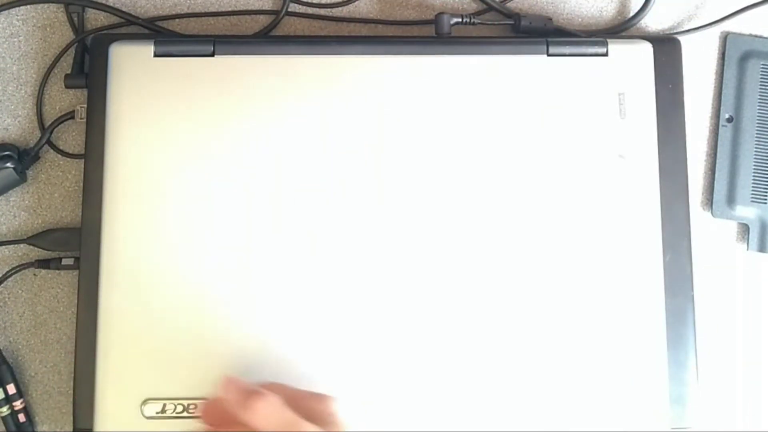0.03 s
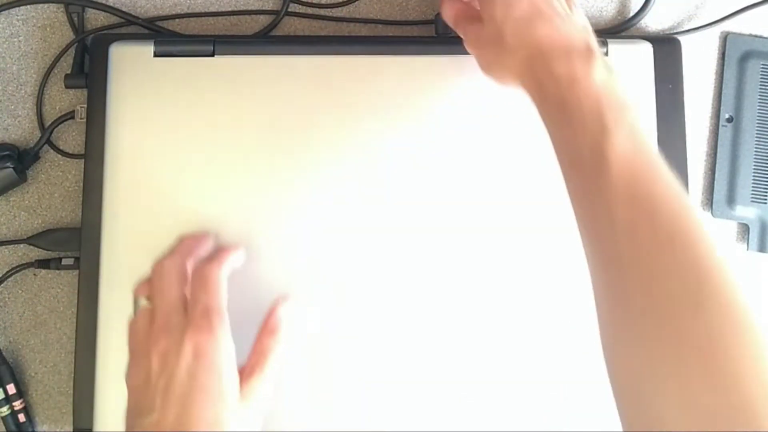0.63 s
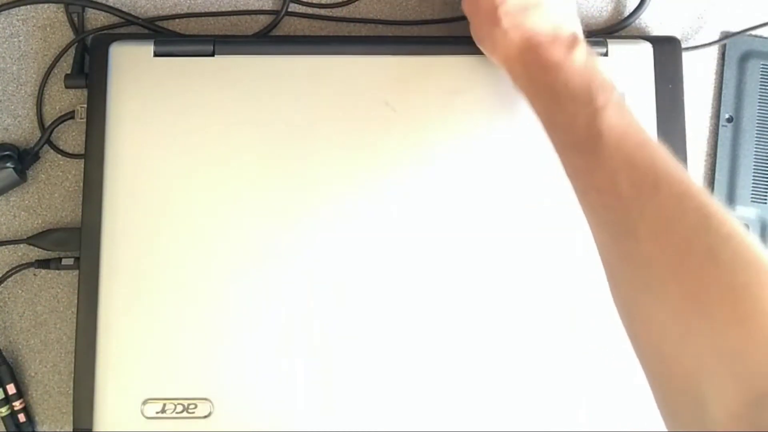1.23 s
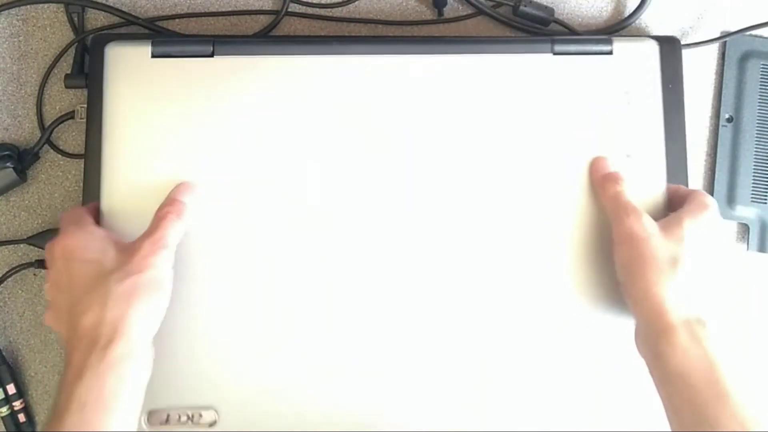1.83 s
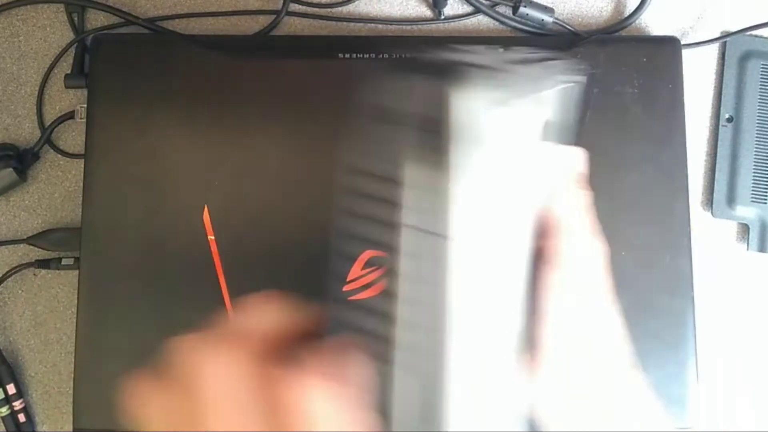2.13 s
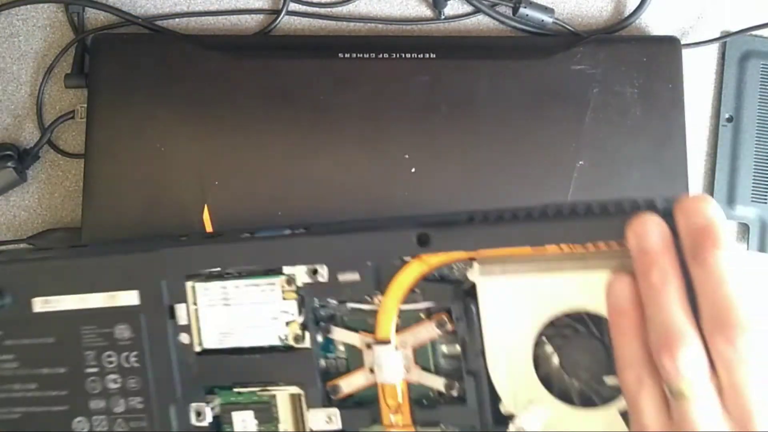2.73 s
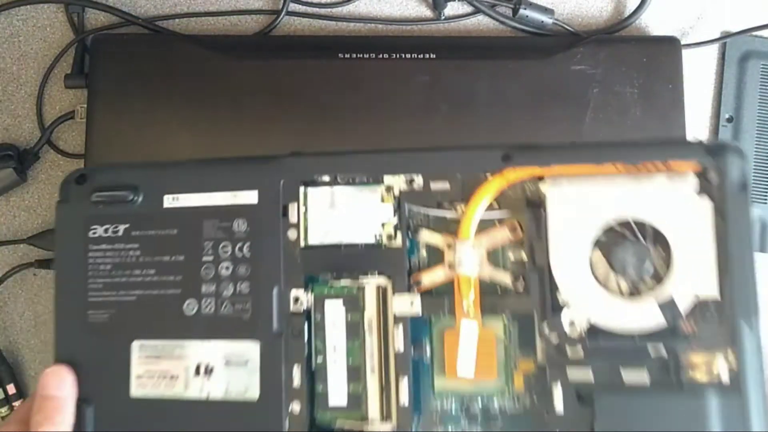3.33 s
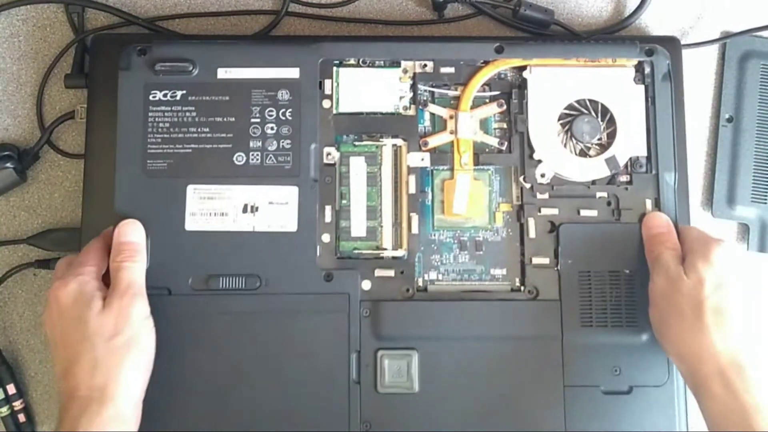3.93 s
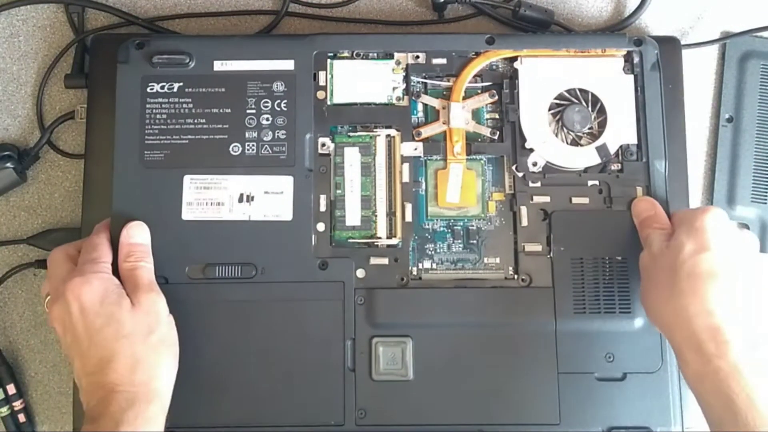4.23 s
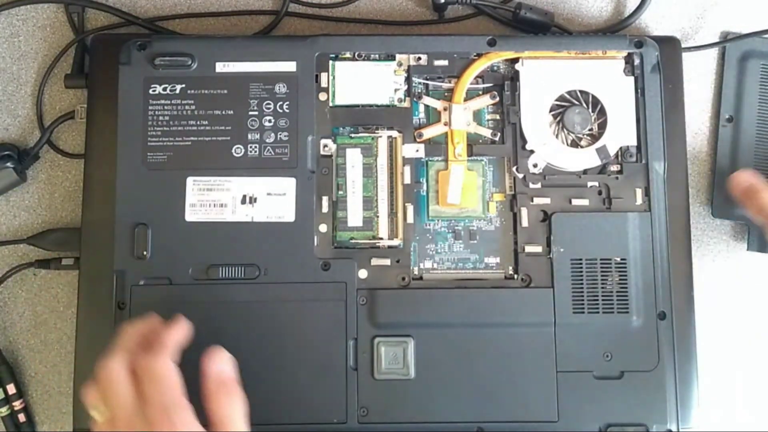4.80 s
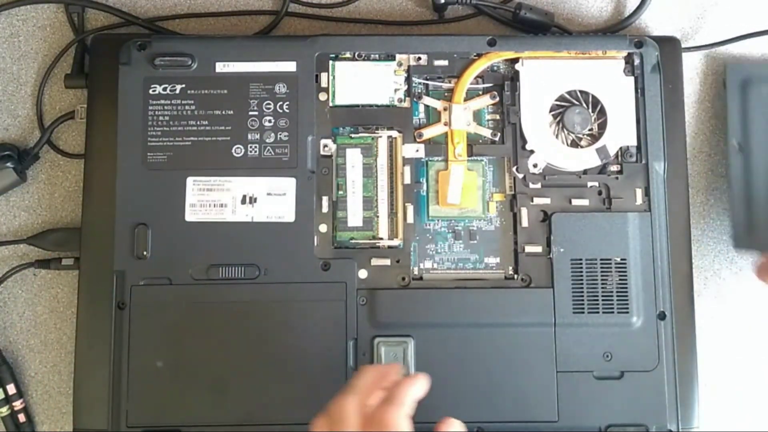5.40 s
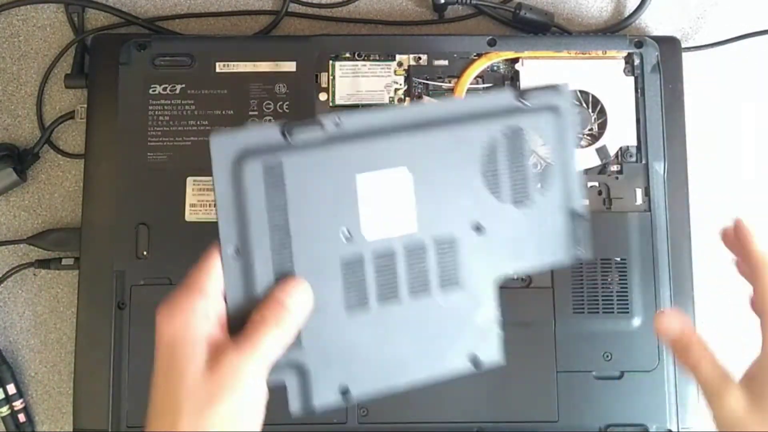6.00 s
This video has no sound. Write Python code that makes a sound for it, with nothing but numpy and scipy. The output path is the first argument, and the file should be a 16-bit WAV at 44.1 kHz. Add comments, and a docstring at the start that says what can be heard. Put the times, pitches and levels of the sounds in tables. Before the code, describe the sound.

A sharp latch snap, scattered plastic clicks and hand rustles, then a hollow thump as a laptop is set down, close up.

```python
"""Laptop shut and turned over

Close up, a closed laptop on a table clicks at its latch, is gripped, lifted, turned over and set down again.
Each plastic edge clicks twice, touching and then seating, and the sprung latch snaps in and bounces. Blunt
blows knock on the case and make the table boom; sliding hands swish. A low rumble and a soft hiss fill the
small room; a few faint, high chirps waver in the background."""
import sys
import numpy as np
from scipy import signal
from scipy.fft import rfft, irfft, next_fast_len
from scipy.io import wavfile

SR = 44100
rng = np.random.default_rng(int(sys.argv[2]) if len(sys.argv) > 2 else 0)


def file_out(sig):
    """Save sig as 16-bit WAV at sys.argv[1]."""
    # one column per channel
    cols = np.atleast_2d(sig).T
    # limit, then scale
    lim = np.clip(cols, -1, 1)
    pcm = np.round(lim * 32767).astype(np.int16)
    wavfile.write(sys.argv[1], SR, pcm)


N = 267113
TIME = np.arange(N) / SR
AGE = np.arange(SR // 2) / SR   # seconds since a hit

# colour of the low rumble: freq_hz, level_db
RUMBLE_COLOUR = [(20, -45), (40, -13), (58, -7), (72, 8.5), (86, 0.5), (115, -5), (160, -24.5), (240, -52)]
# the rumble's slow rise and fall: time_s, level_db
RUMBLE_RIDE = [(0, -49), (1.1, -48.5), (1.5, -54.5), (2.6, -49), (3.1, -52), (3.85, -55), (4.13, -46),
               (4.45, -53), (5.3, -48), (5.6, -58), (5.8, -52)]
# the opening drone sinking into the bed: time_s, level_db
DRONE_FADE = [(0, -52), (1.0, -55), (1.4, -67.5)]
# colour of the hollow murk behind the handling: freq_hz, level_db
MURK_COLOUR = [(120, -3.5), (200, -4.5), (270, 4), (320, -3.5), (400, 2.5), (480, 1), (570, -7.5),
               (700, -6), (900, -20.5), (2000, -23.5)]
# plastic contacts, with their top, mid and low levels: start_s, edge_db, clack_db, hollow_db, seat_s
CONTACTS = [(0.2143, -20, -28, -25.5, 0.00047), (0.2243, -9, -22.5, -17, 0.0035),
            (0.237, -37, -26, -24.5, 0.017), (0.896, -41, -46.5, -36, 0.015),
            (1.1183, -25.5, -22.5, -38, 0.0053), (1.47, -49.5, -32.5, -30.5, 0.016),
            (1.575, -24, -38, -31, 0.0041), (1.808, -35.5, -49, -35.5, .03), (2.189, -34, -42, -38.5, .003),
            (2.249, -36.5, -44.5, -56, 0.0011), (2.35, -44, -41, -45, .002),
            (2.625, -55, -41.5, -50, 0.0075), (2.696, -34, -38.5, -56, .007),
            (3.202, -47, -39, -33, 0.00201), (3.701, -33, -34.5, -38, .002), (3.907, -52.5, -55, -37, .018),
            (4.103, -39, -39, -29.5, .003), (4.137, -39, -42.5, -52, .014),
            (4.541, -30, -37.5, -25.5, 0.014), (4.565, -17, -24.5, -18, 0.0097),
            (4.586, -24.5, -26, -53, .013), (4.612, -36.5, -36.5, -29.5, .034),
            (4.931, -43, -38, -39, .002), (5.019, -53, -49, -44.5, 0.017),
            (5.405, -43.5, -43.5, -40.5, .018), (5.782, -38.5, -41.5, -33, .003)]
# colour shared by all plastic clicks: freq_hz, level_db
PLASTIC_COLOUR = [(120, -9), (300, -2), (700, -1), (1000, -6), (1400, -2.5), (2200, 0), (3100, -3),
                  (3900, -8), (5000, -6), (6800, -8), (8300, -4.5), (9800, 0), (11200, -7), (15500, -13)]
# modes of the thin plastic shell: pitch_hz, level_db, t60_s
SHELL_MODES = [(1386, -10, 0.12), (1710, -0.5, 0.12), (2090, 0.5, 0.065), (2300, -13, 0.04),
               (2920, -8, 0.11), (3440, 6, 0.047), (3690, -3, 0.1), (4387, 2, .08), (5130, -9, .08)]
# the small room's decay: freq_hz, t60_s
ROOM_DECAY = [(300, .26), (1500, .23), (5000, .18), (12000, .16)]
# the lid latch snapping in and bouncing: start_s, level_db
LATCH_HITS = [(0.2275, -6.5), (0.2634, -16), (0.3, -31)]
# modes of the latch spring: pitch_hz, level_db, t60_s
SPRING_MODES = [(4590, -9, .13), (4856, -9, .14), (5792, -10, .22), (7698, -10, .2), (9362, -3, .15),
                (9560, -2, .17), (9698, -1, .17), (9960, -4, .15), (10105, -3, .15), (10363, -2, .16),
                (10423, -1, .16), (10503, -3, .15), (11690, -4, .13), (11830, -3, .13), (12220, -7, .13)]
# blunt blows of fingers, palms and the laptop's feet: start_s, case_db, spot_hz, table_db
BLOWS = [(0.229, -34, 258.5, -44), (0.497, -39.5, 320, -53), (1.122, -35, 522, -35), (1.323, -41, 340, -63),
         (1.5735, -21, 438, -27.5), (1.8092, -27.5, 477, -63), (2.376, -37.5, 314, -73),
         (2.908, -40, 362, -82), (3.0155, -36.5, 337, -58), (3.428, -33, 884, -52),
         (3.771, -41.5, 342, -71), (4.137, -35, 334, -36), (4.566, -11.5, 660, -15),
         (4.574, -22, 246, -18.5), (4.5757, -18, 723, -46), (4.647, -32, 416, -26)]
# modes of the laptop case: pitch_hz, level_db, t60_s
CASE_MODES = [(178, -11, 0.65), (246, 7, 0.13), (290.7, -4.5, 0.74), (343.7, 4, 0.21), (442, -1, 0.34),
              (473, -2.5, 0.19), (588, -16, 0.36), (670, -8, 0.0646), (730, 2, 0.16), (787, -17, 0.6),
              (1125, -3, 0.054), (1400, 2, 0.098)]
# modes of the loaded table top: pitch_hz, level_db, t60_s
TABLE_MODES = [(55, -17, 0.29), (73.2, 2, 0.5), (99.4, -8.5, 0.31), (124.4, -17, 0.36)]
# hands sliding over the case: peak_s, speed_up_s, slow_down_s, level_db
HAND_STROKES = [(0.682, 0.32, 0.18, -65.5), (1.12, 0.28, 0.29, -63.5), (1.78, 0.13, 0.05, -49),
                (2.08, 0.14, .15, -55.5), (2.22, 0.1, 0.087, -49.5), (2.67, 0.33, .19, -38),
                (2.9, 0.3, 0.24, -57), (3.334, 0.18, 0.31, -39), (3.7, 0.29, 0.24, -60),
                (4.06, 0.21, 0.57, -60), (4.8, 0.36, 0.14, -61.5), (5.28, 0.15, 0.33, -64),
                (5.75, 0.08, 0.26, -68)]
# airy top of sliding skin: freq_hz, level_db
SWISH_COLOUR = [(2000, -28.5), (4500, -16.5), (6500, -11.5), (8300, -3), (9800, 2), (11000, -2),
                (12400, -8), (14000, -4.5)]
# lower body of the rub: freq_hz, level_db
DRAG_COLOUR = [(300, -2), (700, 6.5), (1100, 1.5), (1700, 1.5), (3000, -2.5), (5000, -5.5), (9000, -10),
               (15000, -29.5)]
# faint high chirps in the background: start_s, length_s, pitch_hz, level_db
CHIRP_CUES = [(1.016, 0.15, 2680, -56.5), (3.545, 0.19, 2900, -60), (4.213, 0.29, 2450, -60.5)]


def from_db(db):
    """Decibels to gain."""
    return 10 ** (np.asarray(db) / 20)


def unit_rms(x):
    """Scale to an rms of 1."""
    return x / np.sqrt(np.mean(x ** 2) + 1e-20)


def in_time(curve):
    """Read a level curve at every sample."""
    return np.interp(TIME, *np.transpose(curve))


def at_hz(points, hz):
    """Read a curve on a log-frequency axis."""
    known_hz, values = np.transpose(points)
    return np.interp(np.log(hz + 1e-9), np.log(known_hz), values)


def add(track, start_s, sound):
    """Drop a sound into the track."""
    start = int(start_s * SR)
    track[start:start + len(sound)] += sound[:N - start]


def eq(x, colour):
    """Shape a sound with a curve of freq_hz, level_db points."""
    size = next_fast_len(len(x))
    gain = from_db(at_hz(colour, np.fft.rfftfreq(size, 1 / SR)))
    return irfft(rfft(x, size) * gain, size)[:len(x)]


def noise(colour, size=N):
    """Coloured noise, rms 1."""
    return unit_rms(eq(rng.standard_normal(size), colour))


def drift(per_s):
    """A wobble that glides between random values of spread 1."""
    knots = rng.standard_normal(4000)
    return np.interp(TIME * per_s, np.arange(len(knots)), knots)


def attack(rise_s):
    """A soft onset from 0 towards 1."""
    return 1 - np.exp(-AGE / rise_s)


def ring(hz, t60):
    """A struck mode of height 1."""
    return np.sin(2 * np.pi * hz * AGE) * from_db(-60 * AGE / t60)


def room_tail(x):
    """Let a noise die away as the room does, treble first."""
    edges_hz = [0, 700, 2000, 5000, 10000, SR / 2]
    hz, spectrum = np.fft.rfftfreq(len(x), 1 / SR), rfft(x)
    tail = np.zeros(len(x))
    for low, high in zip(edges_hz, edges_hz[1:]):
        band = irfft(spectrum * ((hz >= low) & (hz < high)), len(x))
        tail += band * from_db(-60 * AGE / at_hz(ROOM_DECAY, (low + high) / 2))
    return tail


def room_bed(effort_db, hiss_db=-73, murk_db=-53.5, murk_follow=0.15, throb_db=2.4):
    """Even hiss, a hollow murk that rises with the handling, a fading drone and a throbbing rumble."""
    hiss = noise([(500, 7.5), (2000, 6.5), (6000, -14), (10000, 10), (12000, -18), (15000, -10.5)])
    murk = noise(MURK_COLOUR) * from_db(murk_db + murk_follow * effort_db + 2 * drift(per_s=16))
    drone = noise([(90, -53), (130, -4.5), (185, -31), (600, -66)]) * from_db(in_time(DRONE_FADE))
    rumble = noise(RUMBLE_COLOUR) * from_db(in_time(RUMBLE_RIDE) + throb_db * drift(per_s=17))
    return from_db(hiss_db) * hiss + murk + drone + rumble


def touches(seat_db=-2, quick_decay_s=0.0025, stretch=0.68):
    """An edge touches, then seats a little softer; the slower it seats, the longer both touches scuff."""
    for start_s, edge_db, clack_db, hollow_db, seat_s in CONTACTS:
        decay_s = quick_decay_s + stretch * seat_s
        for delay_s, db in ((0, 0), (seat_s, seat_db)):
            yield start_s + delay_s, edge_db + db, clack_db + db, hollow_db + db, decay_s


def plastic_clicks(crack_db=-0.5, wash_db=-10.5, shell_db=-21, ripple_db=3):
    """Each touch is a short crack, a ring of the shell and a wash of dense modes and room reflections."""
    out = np.zeros(N)
    ripple_hz, fine_hz = np.linspace(100, 16000, 90), np.linspace(100, 16000, 400)
    # the shell's countless small modes and the room are the same for every touch
    fine_modes = np.c_[fine_hz, rng.uniform(-8, 8, len(fine_hz))]
    dense_ring = unit_rms(eq(noise(PLASTIC_COLOUR, size=len(AGE)), fine_modes))
    wash = room_tail(dense_ring) * attack(rise_s=0.004)
    shell = np.array([from_db(db) * ring(hz, t60) for hz, db, t60 in SHELL_MODES])
    grit = noise(PLASTIC_COLOUR, size=N + len(AGE))
    for start_s, edge_db, clack_db, hollow_db, decay_s in touches():
        tone = [(350, hollow_db - 6), (700, hollow_db), (2500, clack_db), (10000, edge_db)]
        # every contact point favours other resonances
        ripple = ripple_db * rng.uniform(-1, 1, len(ripple_hz))
        colour = np.c_[ripple_hz, at_hz(tone, ripple_hz) + ripple]
        crack = grit[rng.integers(N):][:len(AGE)] * np.exp(-AGE / decay_s) * attack(rise_s=0.0006)
        ringing = from_db(clack_db + shell_db) * rng.choice([-1, 1], len(shell)) @ shell
        click = eq(from_db(crack_db) * crack + from_db(wash_db) * wash, colour) + ringing
        add(out, start_s, click[:len(AGE) // 2])
    return out


def latch(snap_db=4, decay_s=0.0019, spring_db=-24):
    """The hook gives a very bright snap, then its spring rings briefly."""
    out = np.zeros(N)
    snap_colour = [(3000, -23.5), (7000, -27), (8500, -19.5), (9700, -3.5),
                   (10500, -2.5), (11200, -18), (12200, -8.5), (13000, -55)]
    for start_s, db in LATCH_HITS:
        snap = noise(snap_colour, size=len(AGE)) * np.exp(-AGE / decay_s) * attack(rise_s=0.0024)
        spring = sum(ring(hz, t60) * from_db(mode_db + rng.normal(0, 1.64)) * rng.choice([-1, 1])
                     for hz, mode_db, t60 in SPRING_MODES)
        add(out, start_s, from_db(db) * (from_db(snap_db) * snap + from_db(spring_db) * spring))
    return out


def knocks(spot_cycles=14, modes_db=-17, wash_db=-16, reach_octaves=0.98):
    """A blow flexes one spot of the case, wakes the modes near its pitch and shakes the table."""
    out = np.zeros(N)
    bloom = attack(rise_s=0.0031)
    boom = sum(from_db(db) * ring(hz, t60) for hz, db, t60 in TABLE_MODES) * bloom
    case = np.array([(-1) ** k * from_db(db) * ring(hz, t60)
                     for k, (hz, db, t60) in enumerate(CASE_MODES)])
    for start_s, case_db, spot_hz, table_db in BLOWS:
        spot = 2 * ring(spot_hz, t60=spot_cycles / spot_hz) * attack(rise_s=0.0019)
        octaves_away = np.log2(np.array(CASE_MODES)[:, 0] / spot_hz)
        modes = np.exp(-(octaves_away / reach_octaves) ** 2 / 2) @ case
        wash_colour = [(spot_hz / 4, -20), (spot_hz, 0), (spot_hz * 2, -20), (spot_hz * 10, -60)]
        wash = room_tail(noise(wash_colour, size=len(AGE))) * bloom
        knock = spot + from_db(modes_db) * modes + from_db(wash_db) * wash
        add(out, start_s, from_db(case_db) * knock - from_db(table_db) * boom)
    return out


def hand_effort(resting_db=-77, brisk_db=-39, up_curve=1.34, down_curve=1.96):
    """Strokes swell and trail off over the faint rub of resting hands, in dB against a brisk stroke."""
    power = from_db(resting_db) ** 2
    for peak_s, up_s, down_s, db in HAND_STROKES:
        swell = np.sin(np.pi / 2 * np.clip(1 + (TIME - peak_s) / up_s, 0, 1)) ** up_curve
        fade = np.sin(np.pi / 2 * np.clip(1 - (TIME - peak_s) / down_s, 0, 1)) ** down_curve
        power = power + (from_db(db) * swell * fade) ** 2
    return 10 * np.log10(power) - brisk_db


def hand_rub(effort_db, swish_db=-40, drag_db=-58.5, drag_follow=0.28,
             catches_per_s=45, tick_db=-2, tick_s=0.012):
    """Sliding skin swishes and drags on the textured plastic, catching with tiny ticks."""
    swish = noise(SWISH_COLOUR) * from_db(swish_db + effort_db + 1.46 * drift(per_s=57))
    catches = (rng.random(N) < catches_per_s / SR) * rng.random(N)
    tick_envelope = signal.lfilter([1], [1, -np.exp(-1 / (tick_s * SR))], catches + 1e-18)
    ticks = unit_rms(tick_envelope * noise(DRAG_COLOUR))
    drag = noise(DRAG_COLOUR) * from_db(2 * drift(per_s=45)) + from_db(tick_db) * ticks
    return swish + drag * from_db(drag_db + drag_follow * effort_db)


def chirps(waver_hz=170):
    """Faint, high, raspy tones in the background swell, waver in pitch and fade."""
    out = np.zeros(N)
    for start_s, length_s, hz, db in CHIRP_CUES:
        swell = np.sin(np.pi * np.clip((TIME - start_s) / length_s, 0, 1))
        phase = 2 * np.pi * np.cumsum(hz + waver_hz * drift(per_s=14)) / SR
        rasp = drift(per_s=800)
        out += from_db(db) * swell * rasp * np.sin(phase)
    return out


def scene():
    """Hits, hands, background chirps and room bed meet at one microphone."""
    effort_db = hand_effort()
    hits = plastic_clicks() + latch() + knocks()
    return (hits + hand_rub(effort_db) + chirps() + room_bed(effort_db))[None]


def record(dry):
    """Roll off the sub-bass and cut the very top steeply."""
    low_cut = signal.butter(5, 36, "high", fs=SR, output="sos")
    high_cut = signal.ellip(12, 0.2, 80, 15740, fs=SR, output="sos")
    return signal.sosfilt(high_cut, signal.sosfilt(low_cut, dry))


dry = scene()
out = record(dry)
file_out(out)
```